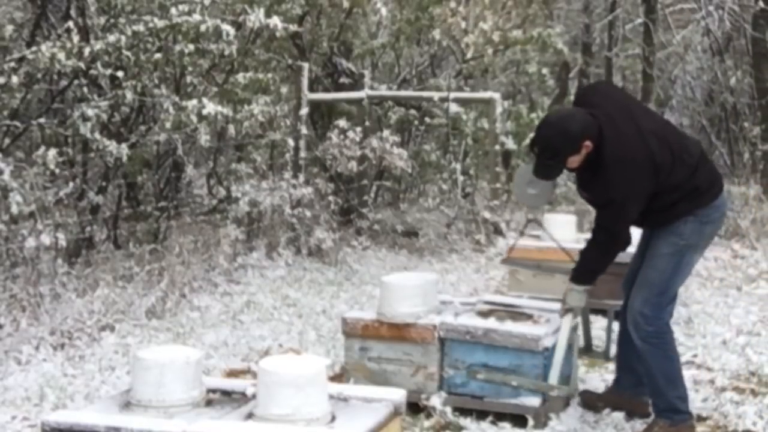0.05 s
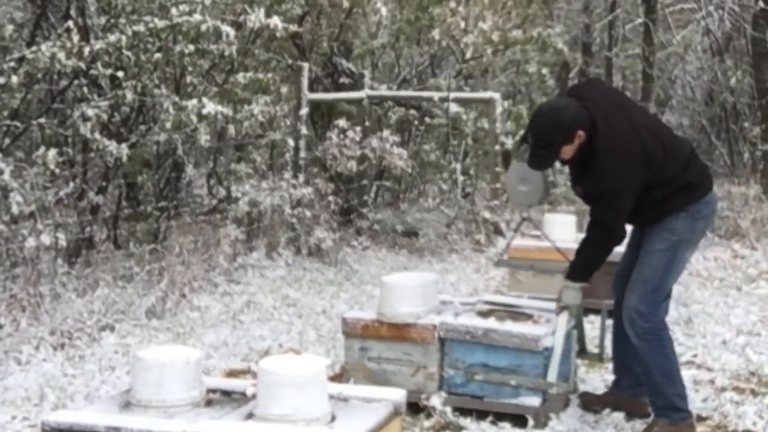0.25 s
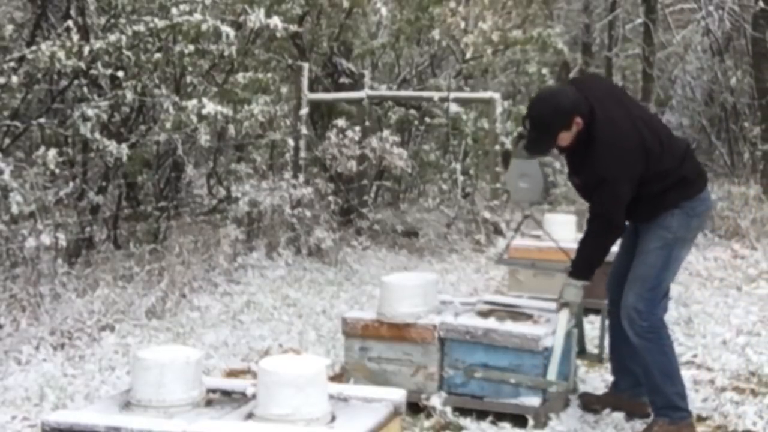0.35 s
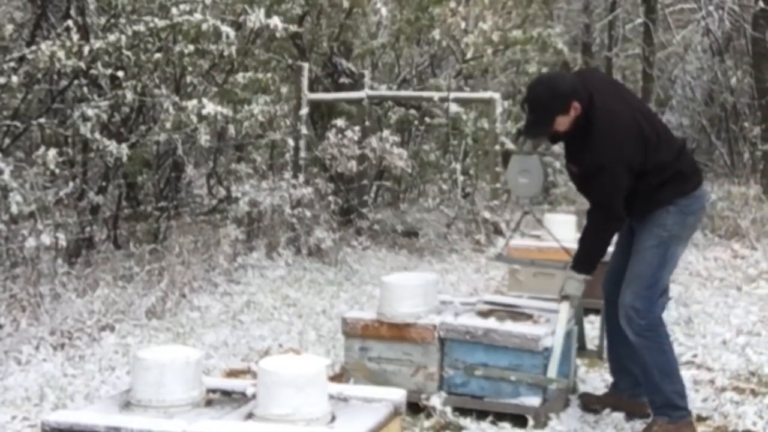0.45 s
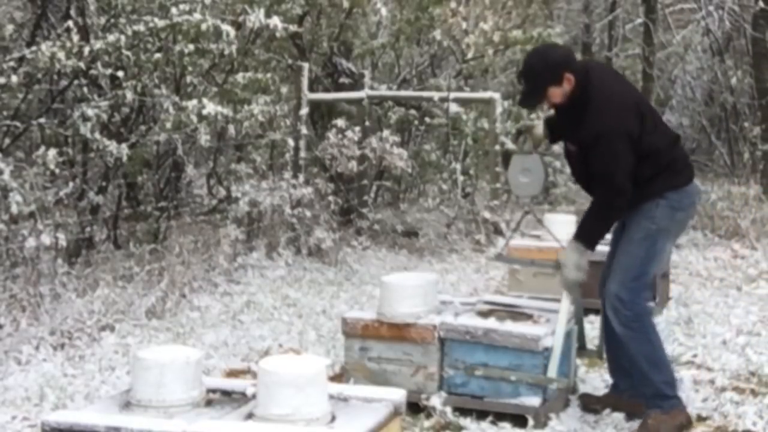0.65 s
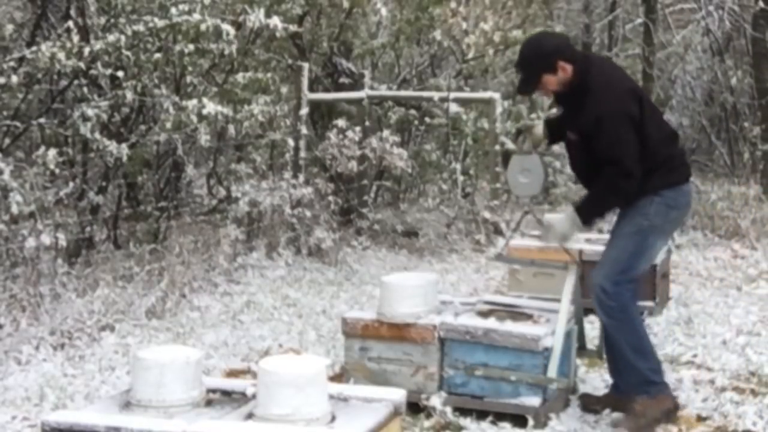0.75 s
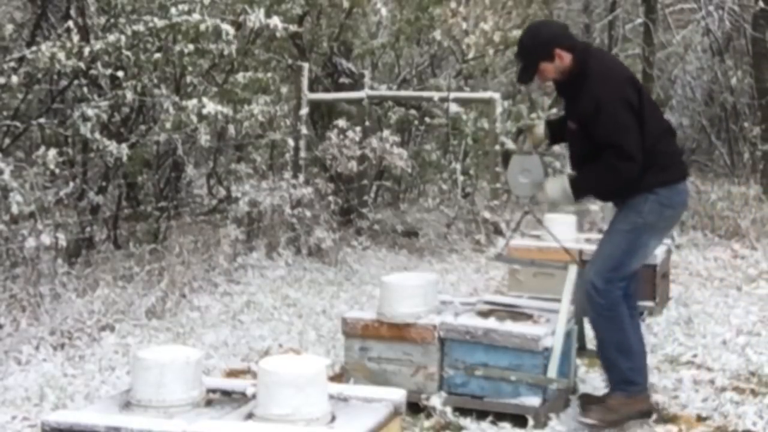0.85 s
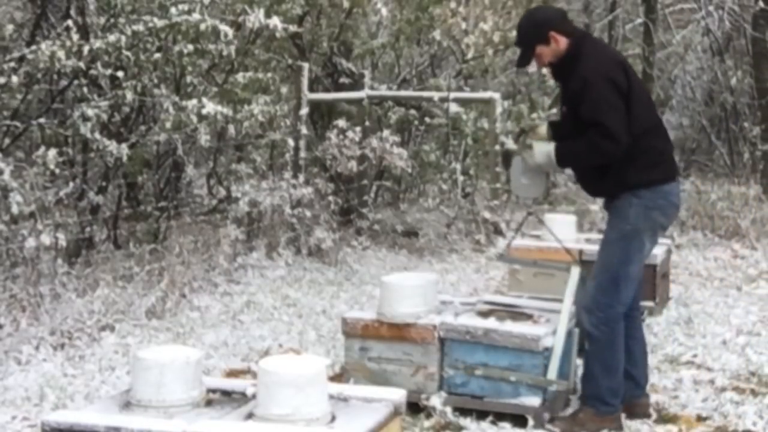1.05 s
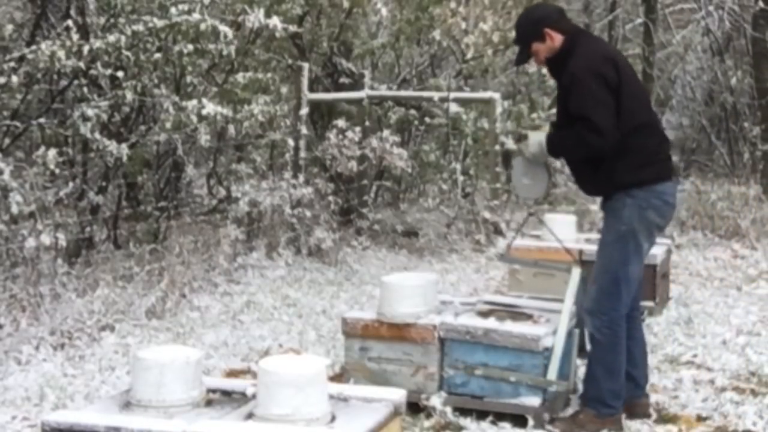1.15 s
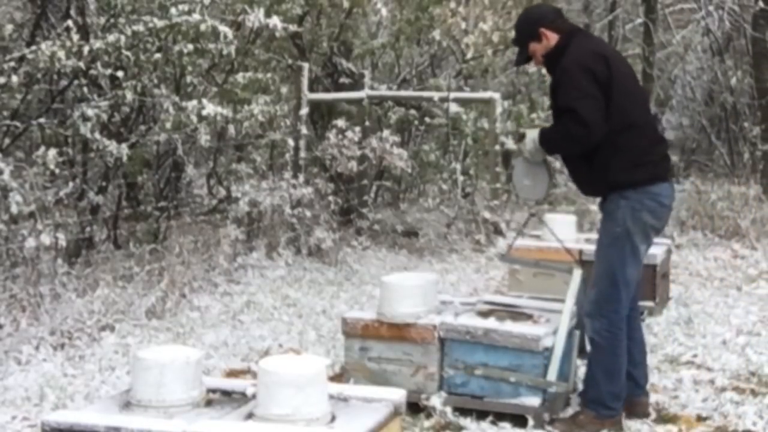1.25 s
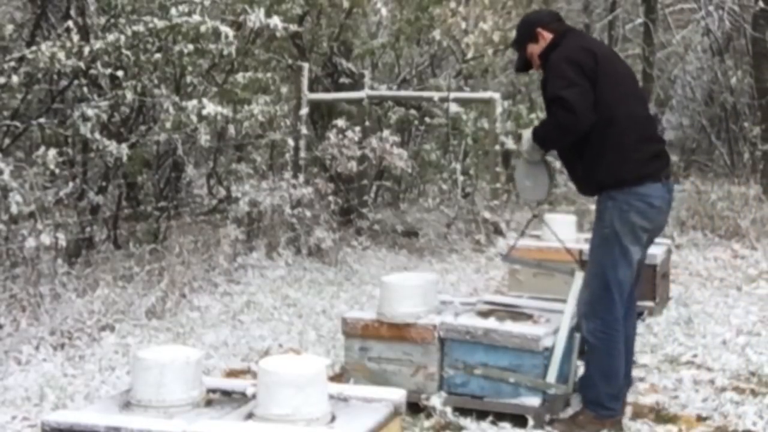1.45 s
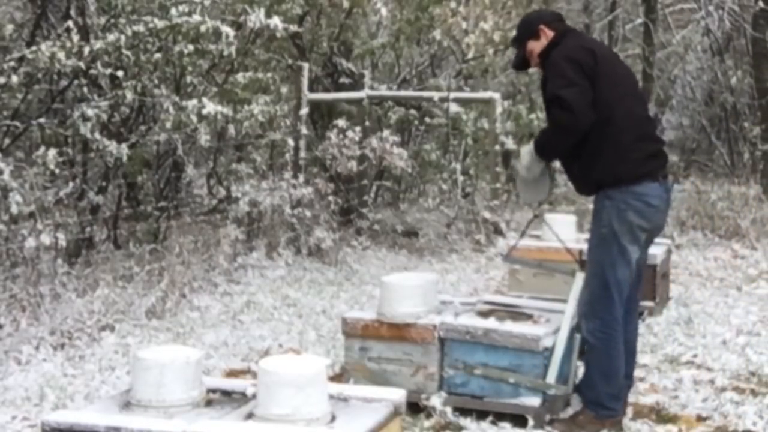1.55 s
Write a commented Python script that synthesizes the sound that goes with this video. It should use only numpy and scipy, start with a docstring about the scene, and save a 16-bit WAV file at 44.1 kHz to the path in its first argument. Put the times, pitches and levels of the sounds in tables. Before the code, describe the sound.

Steel bar and hook clank sharply against a wooden beehive outdoors, with knocks and a scrape

```python
"""Sharp clanks of steel come first, with brief squeaks, hollow knocks and a scrape.
A lifting bar with a hanging scale is worked against a wooden beehive in a snowy clearing.
Hard parts ring as fading tones, wood and steel add bursts of noise, and bumps are low fading tones.
Swelling noise makes boots in snow and a rustling jacket.
Ground, hives and trees scatter a tail of the work, over soft air and a faint, wavering low drone."""
import sys
import numpy as np
from scipy import signal
from scipy.fft import rfft, irfft
from scipy.io import wavfile
from scipy.ndimage import uniform_filter1d

SR = 44100
rng = np.random.default_rng(int(sys.argv[2]) if len(sys.argv) > 2 else 0)


def int16_out(signal):
    """Quantize to a 16-bit WAV file."""
    q = np.round(np.clip(np.atleast_2d(signal).T, -1, 1) * 32767)
    wavfile.write(sys.argv[1], SR, q.astype(np.int16))


N = 70560  # 1.6 s


def from_db(db):
    """Turn decibels into a gain."""
    return 10 ** (np.asarray(db) / 20)


def times():
    """Give the time in seconds of every sample."""
    return np.arange(N) / SR


def unit(x):
    """Scale a sound so that its squared samples sum to one."""
    return x / np.sqrt(np.sum(x ** 2) + 1e-20)


def at_hz(points, hz):
    """Read a curve between its points, with pitch on a logarithmic scale."""
    point_hz, values = np.transpose(points)
    return np.interp(np.log(hz + 1e-9), np.log(point_hz), values)


def spectrum_gain(spectrum):
    """Give the gain of a spectrum at every frequency of the Fourier transform."""
    hz = np.arange(N // 2 + 1) * SR / N
    return from_db(at_hz(spectrum, hz))


def noise(spectrum):
    """Shape random noise to a spectrum, with an rms level of one."""
    x = irfft(rfft(rng.standard_normal(N)) * spectrum_gain(spectrum), N)
    return x / x.std()


def dull(x, cutoff_hz):
    """Take away treble with a two-pole low-pass, as a softer contact does."""
    low_pass = signal.butter(2, min(cutoff_hz, .45 * SR), fs=SR, output="sos")
    return signal.sosfilt(low_pass, x + 1e-18)


def drift(cutoff_hz):
    """Wander at random, no faster than the cutoff, with a spread of one."""
    x = dull(rng.standard_normal(2 * N), cutoff_hz)[N:]  # skip the filter's start
    return x / x.std()


def dying(t60):
    """Fade from one, losing 60 dB in t60 seconds."""
    return np.exp(-np.log(1000) * times() / t60)


def through(x, response):
    """Pass a sound through a body or a space by convolution."""
    return signal.fftconvolve(x, response)[:N]


def add(out, start_s, x):
    """Mix a sound in from its start time."""
    i = int(max(start_s, 0) * SR)
    out[i:] += x[:N - i]


def ringing(modes):
    """Sum the fading tones of a struck body, with signs that alternate and an energy of one."""
    total = np.zeros(N)
    for k, (hz, db, t60) in enumerate(modes):
        tone = np.sin(2 * np.pi * hz * times())
        total += (-1) ** k * from_db(db) * dying(t60) * tone
    return unit(total)


def burst(spectrum, t60):
    """Let noise fade like many crowded tones, evened to follow a spectrum, with an energy of one."""
    x = rfft(rng.standard_normal(N) * dying(t60))
    even = x / np.sqrt(uniform_filter1d(np.abs(x) ** 2, size=800) + 1e-20)
    # A minimum-phase filter colours the burst without sounding ahead of it.
    cepstrum = irfft(np.log(spectrum_gain(spectrum)), N)
    causal = np.exp(rfft(2 * cepstrum[:N // 2], N))
    first_half = np.arange(N) < N // 2
    return unit(irfft(even * causal, N) * first_half)


def swells(rows):
    """Raise and lower the level smoothly around the middle time of each row."""
    level = np.zeros(N)
    for middle_s, length_s, db in rows:
        level += from_db(db) * np.exp(-2 * ((times() - middle_s) / length_s) ** 2)
    return level


# tones of the steel bar: (pitch [Hz], relative level [dB], time to fade 60 dB [s])
BAR_TONES = [(2700, -11, .07), (3180, -12, .08), (3485, -1.5, .075), (4200, -2, .065), (4640, -7, .065),
             (4765, -9, .08), (5272, -5, .065), (5420, -2, .06), (5815, 3.5, .042), (8325, -15, .04),
             (8805, -14, .04), (11480, -13, .04), (14380, -13, .045), (15165, -11, .05)]


def bar_ring():
    """Ring the steel bar: a struck bar sounds at several pitches, each fading on its own."""
    return ringing(BAR_TONES)


# steel strikes steel: (time [s], level [dB], low-pass cutoff [Hz], bar ring against crack [dB])
CLANKS = [(0.0005, -5.5, 6360, -6.5), (0.2197, -15, 5950, -20), (0.2297, -5.5, 16100, -12.5),
          (0.2301, 10.5, 11200, 5), (0.2325, 1.5, 12000, -15.5), (0.2682, -8, 6230, -4),
          (0.376, -32, 4500, -6), (0.4491, 1, 7000, -16), (0.4522, -1.5, 8300, -16),
          (0.5057, -7.5, 7800, -5), (0.5781, -14, 7000, -5), (0.6528, -22, 6140, -11),
          (0.7040, -33, 12000, -5), (0.7230, -29, 10000, -4), (1.083, -31.5, 12000, -6.5),
          (1.312, -40.5, 3470, -17)]
# hard click of contact: (frequency [Hz], relative level per Hz [dB])
CLICK_SPECTRUM = [(200, -16), (1500, -21), (2100, -23), (2800, -5.5), (4000, -3), (4600, 1.5), (5800, 0.5),
                  (6500, -19), (9000, -15.5), (10400, -20), (16000, -15.5)]
# crowded overtones of hook and scale: (frequency [Hz], relative level per Hz [dB])
CRACK_SPECTRUM = [(60, -42), (200, -31), (900, -14.5), (1600, -10.5), (2100, -14.5), (2850, -0.5),
                  (3500, -2.5), (3900, -8.5), (4500, 0.5), (5800, -12), (6300, -11), (7100, -8.5),
                  (9000, -9.5), (10300, -14), (16000, -6)]
CLICK_T60_S, CRACK_T60_S = 0.0087, 0.037


def clanks(bar):
    """Strike steel on steel: each blow is a hard click, a short crack and the ring of the bar."""
    out = np.zeros(N)
    for start_s, db, cutoff_hz, ring_db in CLANKS:
        click = burst(CLICK_SPECTRUM, CLICK_T60_S)
        crack = burst(CRACK_SPECTRUM, CRACK_T60_S)
        blow = click + crack + from_db(ring_db) * bar
        add(out, start_s, from_db(db) * unit(dull(blow, cutoff_hz)))
    return out


# the hook slips and squeaks: (time [s], length [s], average pitch [Hz], tone level before low-pass [dB])
SQUEAKS = [(0.0461, 0.0044, 4220, -32.5), (0.2265, 0.0065, 3350, -25.5), (0.2580, .0065, 3505, -20.5)]
SQUEAK_EDGE_S, SQUEAK_CUTOFF_HZ = .0006, 6900
PITCH_WAVER, WAVER_CUTOFF_HZ = 0.03, 1380  # waver as a fraction of the pitch
GRIT_DB = -0.5  # against the tone


def squeaks():
    """Stick and slip for a few milliseconds: an unsteady tone with steely grit."""
    out, t = np.zeros(N), times()
    for start_s, length_s, hz, db in SQUEAKS:
        pitch_hz = hz * (1 + PITCH_WAVER * drift(WAVER_CUTOFF_HZ))
        tone = np.sqrt(2) * np.sin(2 * np.pi * np.cumsum(pitch_hz) / SR)
        grit = from_db(GRIT_DB) * noise(CRACK_SPECTRUM)
        gate = np.clip(np.minimum(t, length_s - t) / SQUEAK_EDGE_S, 0, 1)
        add(out, start_s, from_db(db) * gate * (tone + grit))
    return dull(dull(out, SQUEAK_CUTOFF_HZ), SQUEAK_CUTOFF_HZ)


# tones of the wooden box: (pitch [Hz], relative level [dB], time to fade 60 dB [s])
BOX_TONES = [(325, -8, .06), (628, -4, .05), (790, -10, .03), (1003, -1, .085), (1085, -7, .07),
             (1200, 0, .06), (1315, -5, .03), (1630, -7, .03)]


def box_ring():
    """Ring the hive box: its wood sounds at several lower pitches that fade quickly."""
    return ringing(BOX_TONES)


# the bar knocks on the hive: (time [s], level [dB], low-pass cutoff [Hz])
KNOCKS = [(0.001, -22.5, 3000), (0.047, -28.5, 3960), (0.0905, -23.5, 850), (0.104, -30.5, 4500),
          (0.2283, -2, 4940), (0.2395, -11, 2000), (0.2467, -15, 1010), (0.45, -9.5, 3960),
          (0.4622, -14.5, 1970), (0.5010, -15.5, 1180), (0.5420, -14.5, 3000), (0.5761, -11, 4000),
          (0.586, -26, 3520), (0.6530, -11.5, 3510), (0.6635, -17.5, 1580), (0.676, -25.5, 3000),
          (0.7240, -22.5, 1200), (0.891, -31.5, 2013), (1.285, -34.5, 1190), (1.312, -34, 2010),
          (1.474, -35, 1200)]
# dry sound of the wood: (frequency [Hz], relative level per Hz [dB])
WOOD_SPECTRUM = [(60, -31.5), (130, -4), (300, -1), (500, 0.5), (900, 1.5), (1300, -2), (2000, -4),
                 (3200, 3), (4500, -12), (12000, -15)]
WOOD_T60_S, BOX_RING_DB = 0.047, -4.5  # ring level against the dry wood


def knocks(box):
    """Knock on wood: each knock is a dry burst and the ring of the box."""
    out = np.zeros(N)
    for start_s, db, cutoff_hz in KNOCKS:
        knock = burst(WOOD_SPECTRUM, WOOD_T60_S) + from_db(BOX_RING_DB) * box
        add(out, start_s, from_db(db) * unit(dull(knock, cutoff_hz)))
    return out


# dull bumps of box and boots: (time [s], level [dB], pitch [Hz], time to fade 60 dB [s])
THUDS = [(0.073, -20.5, 64, 0.18), (0.092, -26, 446, 0.021), (0.174, -20.5, 64.4, 0.2),
         (0.231, -13, 202, 0.044), (0.24, -12.5, 146, .06), (0.2461, -12.5, 300, .035),
         (0.281, -25.5, 122, 0.073), (0.456, -19.5, 179, 0.025), (0.503, -14, 329, 0.042),
         (0.507, -17.5, 199, 0.14), (0.728, -26, 372, 0.021), (0.745, -28, 130, .08),
         (1.095, -15.5, 165.3, 0.049), (1.111, -28.5, 160, 0.049), (1.577, -26.5, 116, 0.072)]
THUD_ATTACK_S = 0.0027


def thuds():
    """Bump dully: each bump is a low tone that starts softly and soon fades."""
    out, t = np.zeros(N), times()
    for start_s, db, hz, t60 in THUDS:
        soft_start = 1 - np.exp(-t / THUD_ATTACK_S)
        bump = np.sin(2 * np.pi * hz * t) * dying(t60) * soft_start
        add(out, start_s, from_db(db) * unit(bump))
    return out


# the bar drags along the hive, silent outside these times: (time [s], level [dB])
DRAG = [(0.45, -55.5), (0.462, -50), (0.485, -41), (0.495, -38), (0.501, -39.5), (0.52, -42), (0.546, -44),
        (0.565, -49), (0.60, -67), (0.63, -74)]
SLIPS_PER_S, SLIP_SPREAD_DB = 1800, 6
DRAG_BAR_DB, DRAG_BOX_DB, DRAG_CUTOFF_HZ = -20, -10.5, 7100  # ring levels against the crack


def drag(bar, box):
    """Scrape with dense, uneven slips that shake both the steel and the box."""
    happens = rng.random(N) < SLIPS_PER_S / SR
    direction = rng.choice([-1, 1], N)
    strength = from_db(SLIP_SPREAD_DB * rng.uniform(-1, 1, N))
    slips = happens * direction * strength
    level_db = np.interp(times(), *np.transpose(DRAG), left=-np.inf, right=-np.inf)
    slips = slips / slips.std() * from_db(level_db)
    crack = burst(CRACK_SPECTRUM, CRACK_T60_S)
    body = crack + from_db(DRAG_BAR_DB) * bar + from_db(DRAG_BOX_DB) * box
    return through(slips, unit(dull(body, DRAG_CUTOFF_HZ)))


# scatter from ground and trees: (frequency [Hz], time to fade 60 dB [s], relative level [dB])
TREES = [(150, 0.33, -3), (1000, 0.5, -1.5), (3400, .48, -3.5), (5500, 0.27, -1.5), (14000, 0.18, 1)]
TREES_DB = -16.5
NEAR_DB, NEAR_T60_S, NEAR_DELAY_S = -13.5, .14, .007


def clearing(x):
    """Add quick reflections off hives and ground, and a thin tail from the trees."""
    trees = np.array(TREES)
    edges_hz, tail = np.geomspace(60, 18000, 9), np.zeros(N)
    for low, high in zip(edges_hz, edges_hz[1:]):
        band_pass = signal.butter(2, [low, high], "band", fs=SR, output="sos")
        band = signal.sosfilt(band_pass, rng.standard_normal(N))
        middle_hz = np.sqrt(low * high)
        t60 = at_hz(trees[:, :2], middle_hz)
        level_db = at_hz(trees[:, ::2], middle_hz)
        tail += band * dying(t60) * from_db(level_db)
    near = unit(rng.standard_normal(N) * dying(NEAR_T60_S))
    echo = np.zeros(N)
    # Near and far scatter both start after the same short delay.
    add(echo, NEAR_DELAY_S, from_db(NEAR_DB) * near + from_db(TREES_DB) * unit(tail))
    return x + through(x, echo)


# boots press the snow: (middle time [s], length from peak to nearly gone [s], peak level [dB])
STEPS = [(0.105, 0.058, -59), (0.16, 0.028, -56.5), (0.395, 0.041, -59), (0.903, 0.026, -61),
         (1.286, 0.014, -57), (1.32, 0.019, -61.5), (1.477, 0.017, -54.5), (1.582, 0.037, -62.5)]
# sound of pressed snow: (frequency [Hz], relative level per Hz [dB])
SNOW_SPECTRUM = [(60, -1.5), (150, 3.5), (350, 4), (650, -3.5), (1200, -16.5), (3500, -17), (8000, -41.5),
                 (16000, -39)]


def steps():
    """Press snow under a boot: soft swells of mostly low noise."""
    return swells(STEPS) * noise(SNOW_SPECTRUM)


# the sleeves rustle: (middle time [s], length from peak to nearly gone [s], level before flutter [dB])
JACKET = [(0.85, 0.065, -68), (0.93, 0.033, -78), (1.005, 0.011, -66), (1.08, 0.052, -67.5),
          (1.108, 0.023, -66.5), (1.14, 0.023, -63), (1.37, .055, -64), (1.45, 0.084, -72),
          (1.53, .07, -67)]
# sound of rubbing cloth: (frequency [Hz], relative level per Hz [dB])
CLOTH_SPECTRUM = [(800, -6), (2500, -4.5), (5500, 0.5), (8500, -6.5), (12500, -10.5), (16000, -15)]


def jacket():
    """Slide cloth on cloth as the arms move: swells of bright noise with a fluttering level."""
    flutter = from_db(1.8 * drift(80))
    return swells(JACKET) * flutter * noise(CLOTH_SPECTRUM)


# sound of still air: (frequency [Hz], relative level per Hz [dB])
AIR_SPECTRUM = [(20, -30), (38, -22.5), (55, -14.5), (85, -1.5), (150, -1.5), (280, -7.5), (600, -10.5),
                (1200, -15.5), (2000, -19.5), (3500, -18), (6000, -22.5), (10500, -31.5), (16000, -36)]
AIR_DB = -61
DRONE_HZ, DRONE_DB, DRONE_WAVER_DB = 55.7, -68, 5.5  # average pitch, middle level and its spread


def background():
    """Mix the steady noise of still air with a far drone that wavers in pitch and level."""
    pitch_hz = DRONE_HZ + 2.5 * drift(6.8)
    drone = np.sqrt(2) * np.sin(2 * np.pi * np.cumsum(pitch_hz) / SR)
    drone_level = from_db(DRONE_DB + DRONE_WAVER_DB * drift(5))
    return from_db(AIR_DB) * noise(AIR_SPECTRUM) + drone_level * drone


def scene():
    """Put bar and hive in the clearing, then add boots, jacket and background."""
    bar, box = bar_ring(), box_ring()
    work = clanks(bar) + squeaks() + knocks(box) + thuds() + drag(bar, box)
    mix = clearing(work) + steps() + jacket() + background()
    return mix[None]  # one channel


def record(dry):
    """Cut the treble steeply above 15.8 kHz."""
    low_pass = signal.ellip(10, .2, 70, 15800, fs=SR, output="sos")
    return signal.sosfilt(low_pass, dry)


dry = scene()
out = record(dry)
int16_out(out)
```